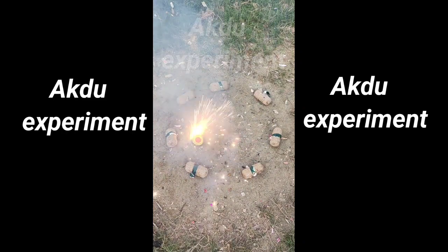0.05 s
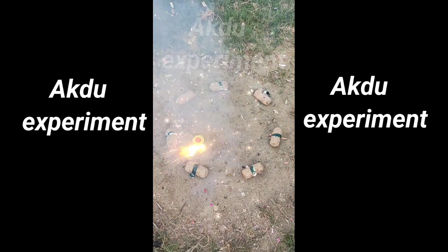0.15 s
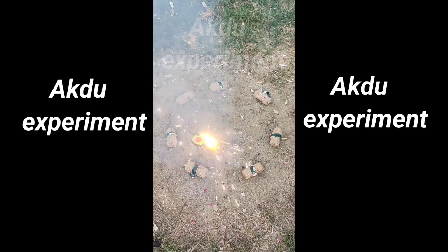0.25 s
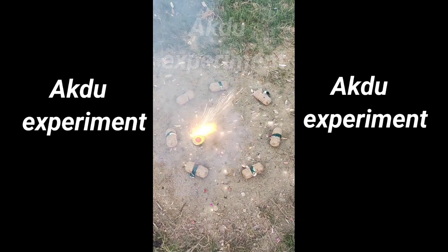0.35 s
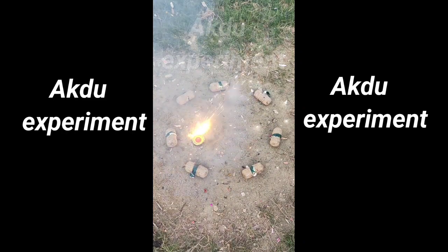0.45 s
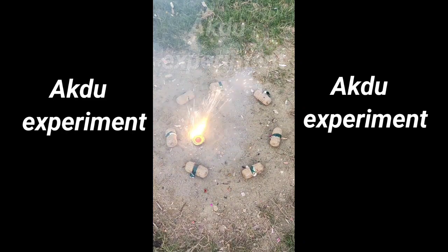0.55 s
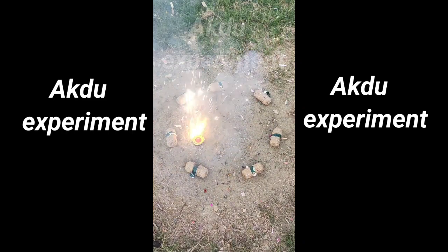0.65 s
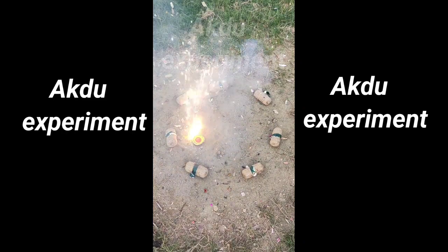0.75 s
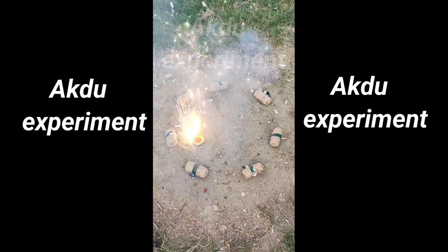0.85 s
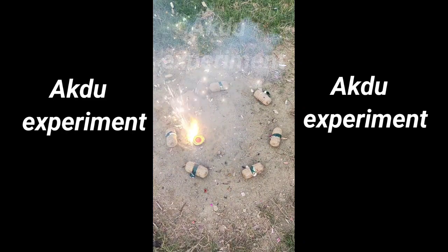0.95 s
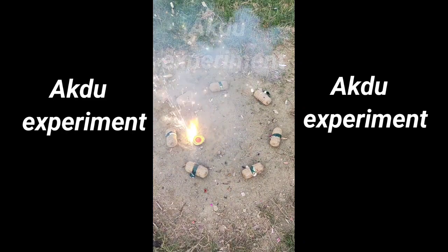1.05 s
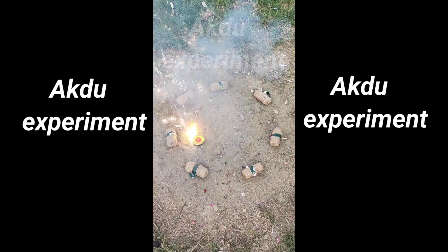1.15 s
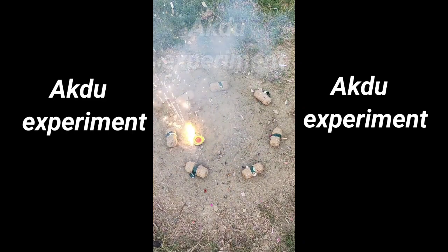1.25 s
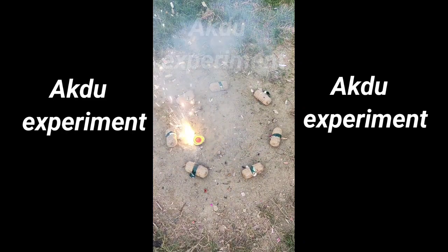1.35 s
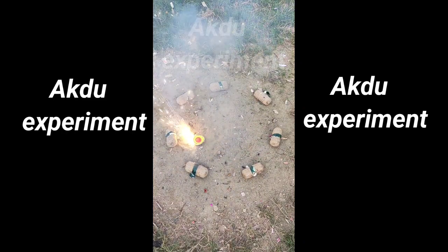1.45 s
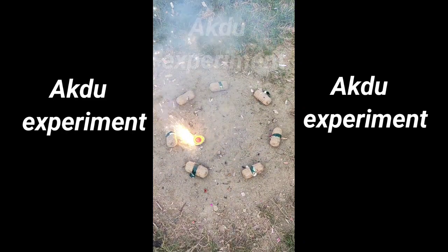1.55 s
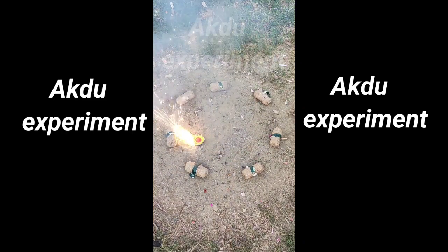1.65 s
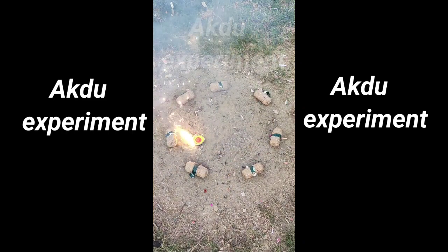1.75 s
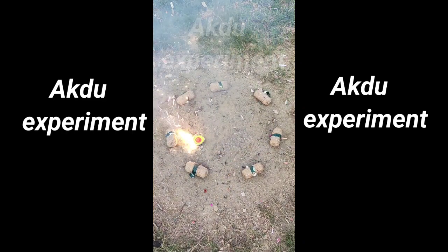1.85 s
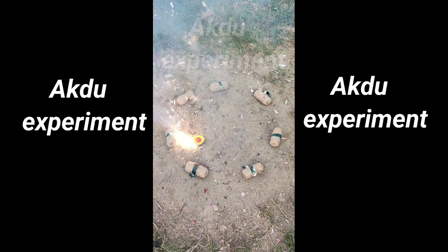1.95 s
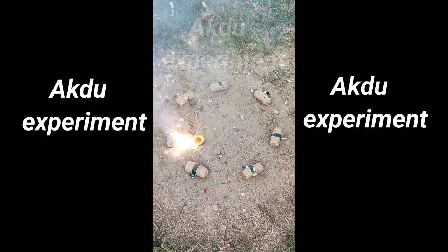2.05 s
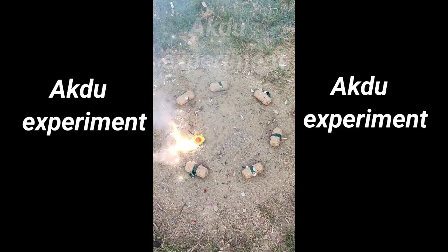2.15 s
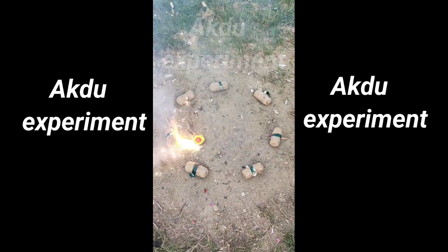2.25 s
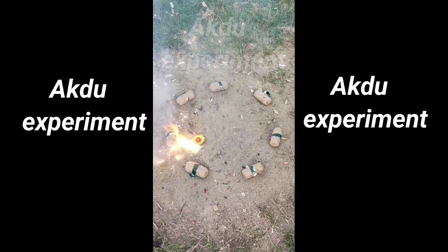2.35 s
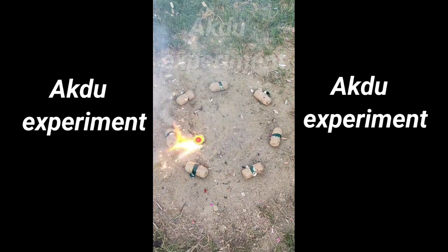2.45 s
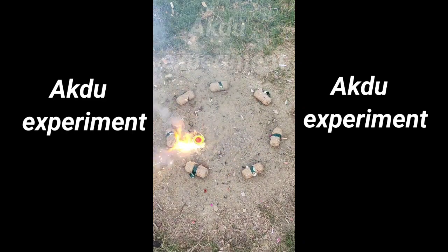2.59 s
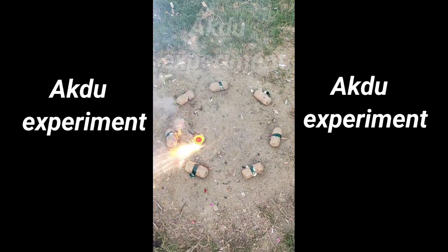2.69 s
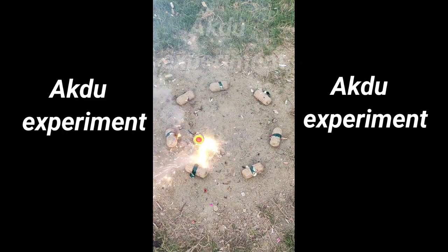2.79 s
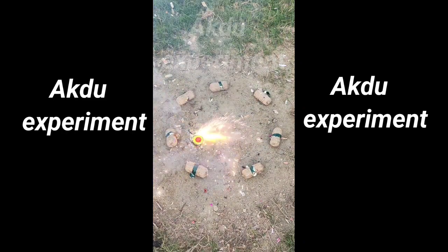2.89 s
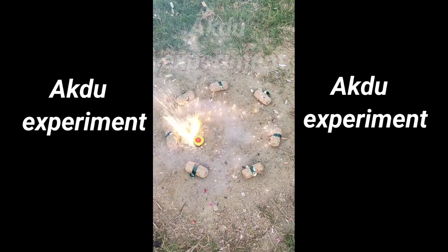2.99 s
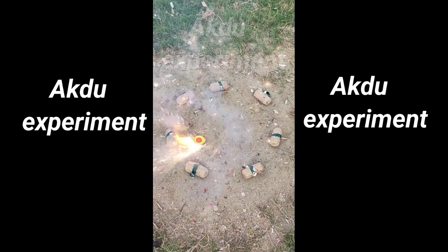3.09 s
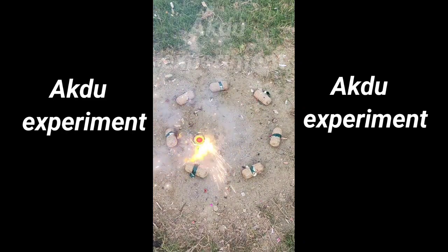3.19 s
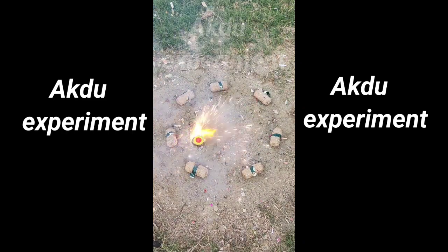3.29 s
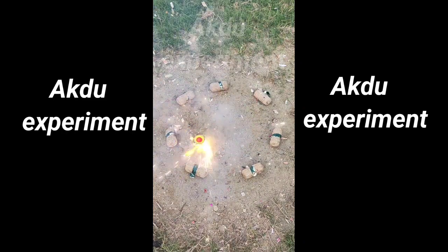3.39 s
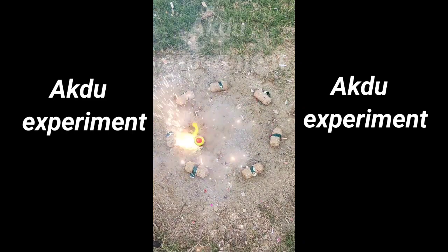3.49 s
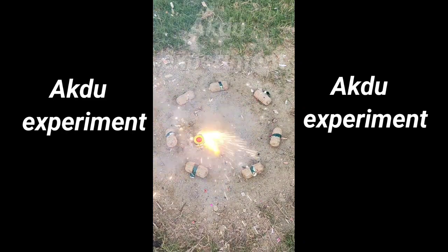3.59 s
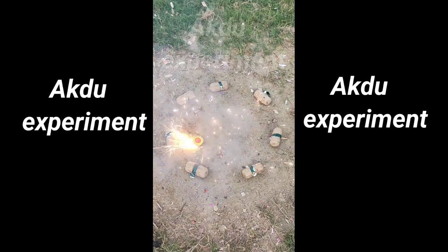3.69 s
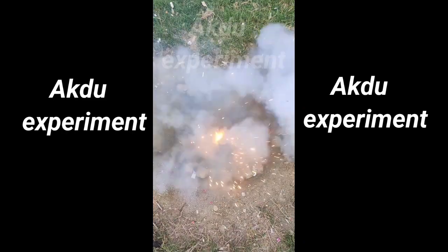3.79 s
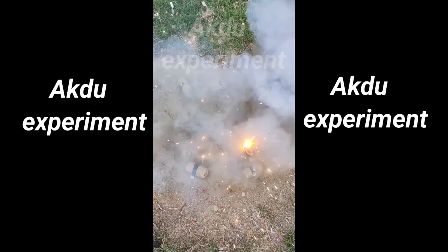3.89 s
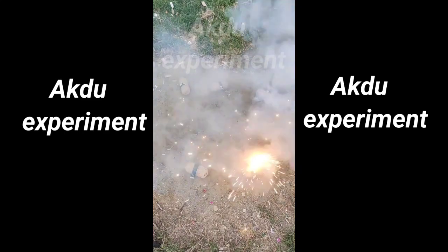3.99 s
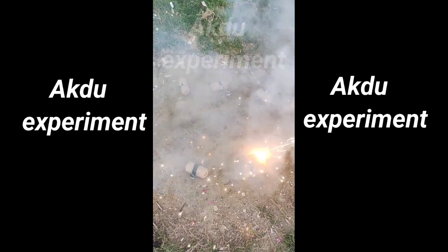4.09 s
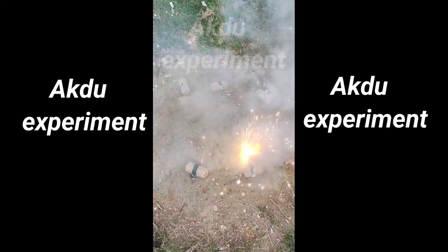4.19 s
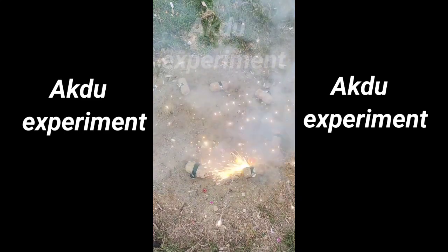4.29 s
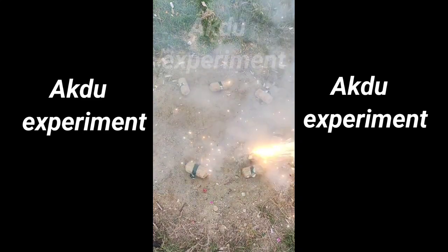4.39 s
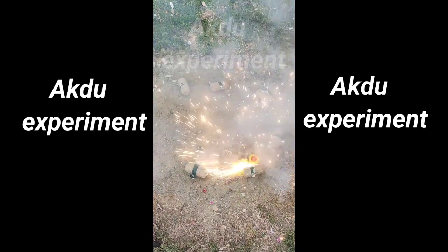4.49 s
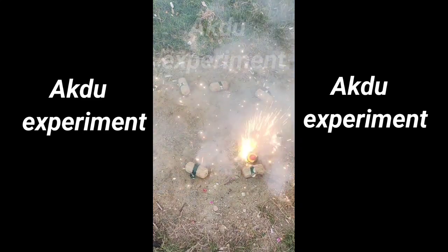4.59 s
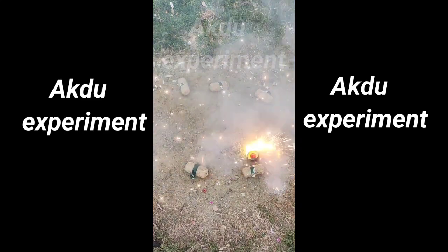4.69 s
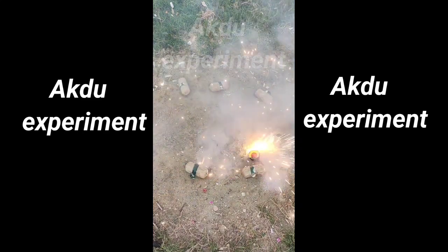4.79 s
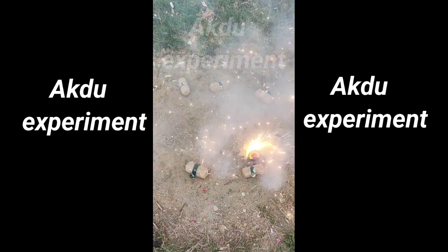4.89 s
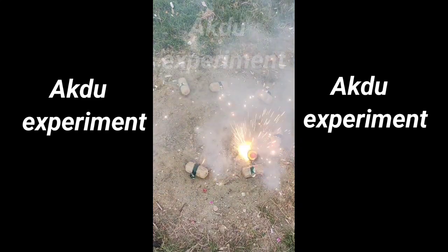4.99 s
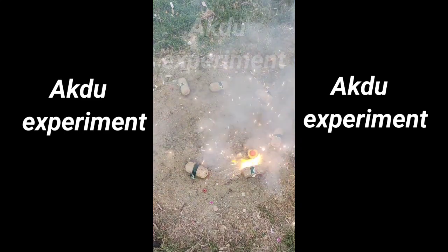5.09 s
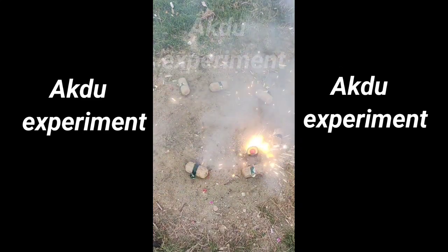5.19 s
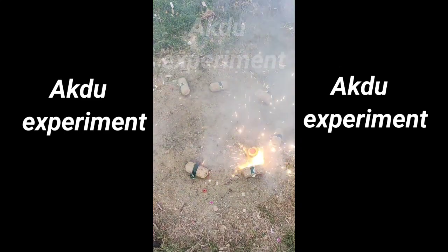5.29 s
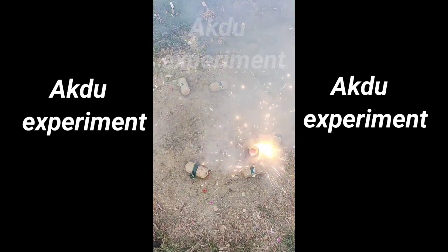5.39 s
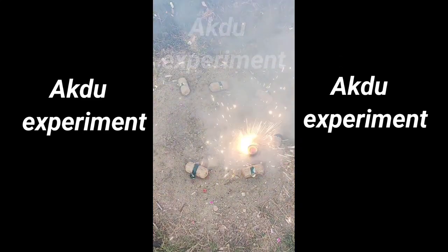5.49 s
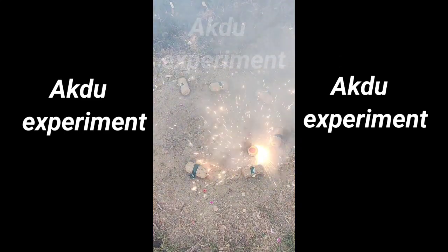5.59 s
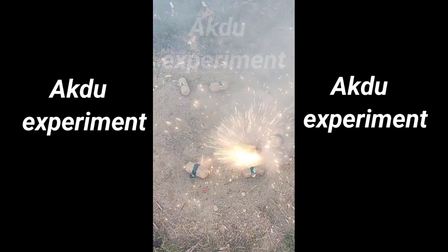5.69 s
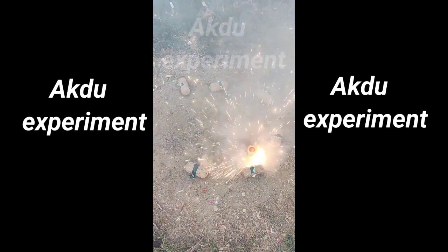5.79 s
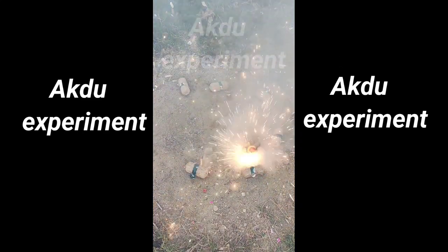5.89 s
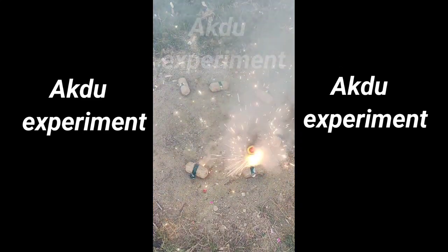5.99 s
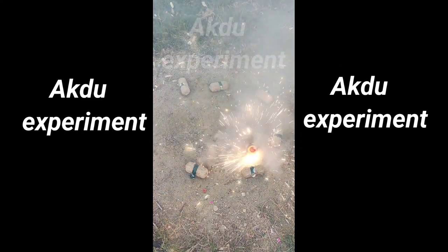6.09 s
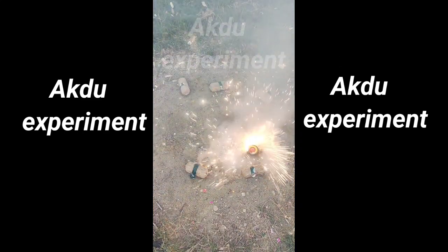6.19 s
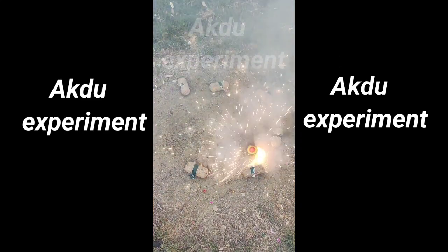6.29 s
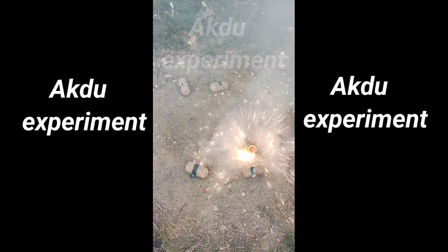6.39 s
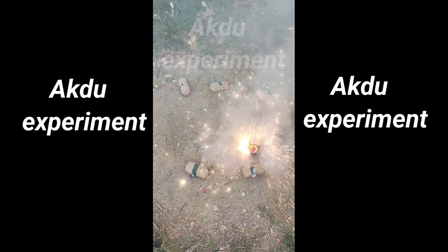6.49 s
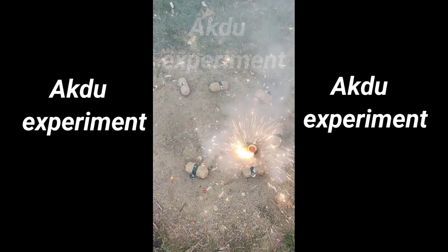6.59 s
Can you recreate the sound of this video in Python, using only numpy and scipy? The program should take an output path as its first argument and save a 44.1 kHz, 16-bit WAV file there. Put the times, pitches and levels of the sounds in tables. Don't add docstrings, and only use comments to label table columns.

```python
import sys
import numpy as np
from scipy import signal
from scipy.fft import rfft, irfft, next_fast_len
from scipy.io import wavfile
from scipy.ndimage import uniform_filter1d, map_coordinates

SR = 44100
rng = np.random.default_rng(int(sys.argv[2]) if len(sys.argv) > 2 else 0)


def persist_wave(psi):
    counts = np.round(np.clip(psi, -1, 1) * 32767).astype(np.int16)
    wavfile.write(sys.argv[1], SR, np.atleast_2d(counts).T)


def elevation(decibels):
    levels = np.asarray(decibels, float)
    return 10 ** (levels / 20)


N = 293265

# time in seconds, jet strength in dB, flame size in dB.
BURN = [(0, -0.5, 0.5), (.15, -0.5, 0.5), (.6, -1.5, 0.5), (.95, -1, 2), (1.4, -3, 2), (1.9, -0.5, 3),
        (2.2, 0.5, 0), (2.45, 1.5, -1), (2.8, -1.5, 4), (3.15, 0.5, 1), (3.7, 0.5, 1.5), (4.5, 3, 1),
        (4.9, 1.5, 2.5), (5.12, 0, 2), (5.5, 2.5, 4.5), (6.0, 1, 0), (6.35, 4.5, 2), (6.65, 4, -0.5)]
# middle in seconds, length in seconds, strength in dB, extra brightness in dB.
SWINGS = [(.2, 0.072, -4.5, -5), (.295, 0.14, 9.5, 4.5), (.41, 0.079, 3.5, 5), (.835, 0.12, -9.5, 6),
          (1.11, 0.18, 3.5, -1), (1.28, 0.11, -3.5, -4), (1.52, .06, -3, -5), (1.68, 0.25, 6, 1.5),
          (1.8, 0.076, -4, 3), (2.2, 0.36, 4, 3.5), (2.57, 0.13, -4.5, 5), (2.71, .17, 9.5, 4),
          (2.9, .08, 3, 5), (3.01, 0.11, -2, -1), (3.27, .13, 9.5, 3), (3.435, 0.091, 8, 7),
          (3.52, .07, -2, -4), (3.63, 0.092, 2.5, -3), (4.29, 0.042, 11.5, -10), (4.54, 0.044, -4.5, -11),
          (4.61, 0.029, -4.5, -3), (4.69, 0.095, -4, 1), (4.785, 0.039, -5.5, -12), (5.03, 0.054, 1.5, 2),
          (5.78, 0.059, 4.5, 5), (5.865, 0.032, 5.5, 0), (6.19, .05, 3.5, -5), (6.26, 0.11, -3, -13),
          (6.56, 0.088, 4, 0)]
# frequency in Hz, level in dB per Hz.
ROAR_COLOUR = [(30, -56), (60, -29.5), (100, -13), (200, -6), (350, -1.5), (600, -4), (900, -7.5),
               (1500, -12.5), (3000, -57)]
HISS_COLOUR = [(400, -27.5), (800, -5), (1200, -3.5), (2000, -1.5), (2700, 0), (3300, -3.5), (4000, -6),
               (5000, -19), (7000, -25)]
FIZZ_COLOUR = [(3000, -65), (4500, 2.5), (5500, -0.5), (7000, 1), (8000, -1), (9200, 1), (11000, -6),
               (12000, -11.5), (14500, -12), (15300, -44)]
# frequency in Hz, level in dB against the sum, share tied to the sum (0 to 1).
PORT_DIFFERENCE = [(705, -24.5, 0.4), (2130, -24.5, 0.7), (2596, -6.5, 0.64), (3420, -2.5, 0.8),
                   (4490, 1, 0.5), (5400, -1.5, 0), (6700, -5.5, 0), (7640, -2.5, 0), (9550, -11, .2),
                   (11440, 1.5, 0.2), (12600, 1, .3), (15000, -8, .1)]
# frequency in Hz, width in Hz.
PORT_NOTCH = (4400, 307)
# frequency in Hz, phase in radians.
PORT_LEAD = [(2000, 2.6), (3500, 2.2), (4400, 1.5), (7500, 1.1), (9000, -1.6), (11600, -1.6), (12100, 1.6)]

# start in seconds, peak in dB, pitch in Hz, time to fall 60 dB in seconds.
BLAST = [
    (3.7332, 11.5, 226, 0.031),
    (3.742, -5, 1300, 0.0097),
]
# start in seconds, peak in dB.
CRACKS = [
    (3.7352, -14),
    (3.7385, -16),
    (3.7425, -16),
    (3.7655, -16),
    (3.7775, -22),
]
# frequency in Hz, level in dB per Hz.
CRACK_COLOUR = [(600, -13), (1500, 8), (4000, -10), (15000, -16)]

# frequency in Hz, level in dB per Hz.
BOOM_COLOUR = [(25, -61), (64, -31), (121, -6), (211, -3.5), (300, -10), (400, -17.5), (480, -40),
               (800, -62), (1760, -120)]
CLAP_COLOUR = [(180, -44), (310, 9.5), (420, 5.5), (600, -6), (900, -24), (1300, -24), (2000, -37.5)]
CRASH_COLOUR = [(500, -43), (800, -17), (1200, -5), (1730, -0.5), (2300, -6.5), (2900, -8.5), (3700, -23.5),
                (4600, -19.5), (6000, -42), (9000, -58)]
SIZZLE_COLOUR = [(2800, -22), (3500, 5), (5000, -4), (6600, -6), (7300, -10), (7950, -26), (8600, -8),
                 (11800, -15), (14000, -26), (15200, -11)]
# frequency in Hz, likeness (-1 to 1).
LIKENESS = [(60, 1), (170, 0.94), (340, 0.79), (690, 0.24), (1400, -0.19), (2100, -0.35), (2800, 0.26),
            (4000, 0.01), (7400, -0.07), (7950, -0.5), (8500, 0.46), (15000, -0.57)]
# middle in seconds, length in seconds, level in dB.
WALLS = [
    (3.765, 0.014, 7),
    (3.87, 0.043, 4.5),
    (3.96, 0.15, 1.5),
    (4.05, .04, -1),
    (4.14, 0.017, -11),
    (4.2, 0.056, 0),
    (4.26, 0.036, -1),
    (4.43, 0.036, 3.5),
]
# middle in seconds, length in seconds, level in dB.
SPRAY = [
    (3.79, .05, 3),
]

# frequency in Hz, gap in dB.
WEAK = [(100, -24), (900, -23), (1500, -14), (4400, -4), (5600, -7), (6500, -6), (7600, -6), (9000, -5),
        (11500, -9), (15000, -4)]
# frequency in Hz, level in dB.
QUIET = [(100, -100), (3000, -77), (8000, -79), (12000, -91), (14400, -68), (15300, -51)]


def jet():
    burn_db, flame_db = curves(BURN)
    swing_db, bright_db = bumps(SWINGS)
    strength_db = burn_db + swing_db
    duck_db = ducking()

    choke_db = 0.31 * np.minimum(swing_db, 0)
    roar_db = -32.5 + flame_db + 0.05 * swing_db + choke_db + 1.0 * wobble(22)
    hiss_db = -28.5 + 0.62 * strength_db + 0.16 * flame_db - 0.1 * bright_db
    fizz_db = -36 + strength_db
    air_db = -44.5 + 0.8 * strength_db + bright_db
    flutter_db = wobble(20) + 0.99 * wobble(150)

    roar = ports(turbulence(patchy_db=-2.16) + 0.23 * sparks(rate=300, spread_db=5.0), ROAR_COLOUR)
    hiss = ports(turbulence(patchy_db=0.8) + 0.38 * sparks(rate=1200, spread_db=5.0), HISS_COLOUR)
    fizz = ports(turbulence(patchy_db=2.0) + 0.5 * sparks(rate=2000, spread_db=0.5), FIZZ_COLOUR)
    air = filtered(fizz, lambda hz: hz > 10000)

    treble_db = 2.5 * duck_db + 0.77 * flutter_db + 0.21 * wobble(14)
    roar_db = roar_db + 0.57 * duck_db + 0.34 * flutter_db + 0.13 * wobble(28)
    hiss_db = hiss_db + duck_db + 0.72 * flutter_db
    fizz_db = fizz_db + treble_db
    air_db = air_db + treble_db + 1.2 * wobble(7.2)
    return (elevation(roar_db) * roar + elevation(hiss_db) * hiss
            + elevation(fizz_db) * unit(fizz - air) + elevation(air_db) * unit(air))


def turbulence(patchy_db):
    z = signal.stft(rng.standard_normal((2, N)), nperseg=512)[2]
    patches = uniform_filter1d(rng.standard_normal(z.shape[1:]), size=8, axis=0)
    patches = uniform_filter1d(patches, size=10, axis=1)
    return signal.istft(z * elevation(patchy_db * unit(patches)), nperseg=512)[1][:, :N]


def sparks(rate, spread_db):
    happens = rng.random(N) < rate / SR
    size = happens * elevation(spread_db * np.minimum(rng.exponential(size=N), 3.5))
    return unit(size * rng.standard_normal((2, N)))


def ports(pair, spectrum):
    centre, width = PORT_NOTCH

    def paths(hz):
        colour = elevation(along(spectrum, hz))
        apart = colour * elevation(along(PORT_DIFFERENCE, hz))
        tied = np.clip(along(PORT_DIFFERENCE, hz, column=2), 0, 1)
        notch = (centre - hz) / np.hypot(centre - hz, width)
        turned = np.exp(1j * along(PORT_LEAD, hz))
        return [colour * notch, apart * np.sqrt(tied) * turned, apart * np.sqrt(1 - tied)]

    mid, tied_side, free_side = filtered(pair[[0, 0, 1]], paths)
    side = tied_side + free_side
    return np.array([mid + side, mid - side]) / np.std(mid)


def ducking():
    depth_db, attack_s, hold_s, release_s = -23.5, 0.008, 0.37, 0.37
    age = np.arange(N) / SR - BLAST[0][0]
    return depth_db * np.clip(age / attack_s, 0, 1) * np.clip(1 - (age - hold_s) / release_s, 0, 1)


def blast():
    age, swing = ringing(BLAST[0])
    return -swing * (1 - np.exp(-age / 0.0015))


def cracks():
    t = np.arange(N) / SR
    shape = np.zeros(N)
    for start, peak_db in CRACKS:
        shape += (t > start) * elevation(peak_db - 60 * np.maximum(t - start, 0) / 0.012)
    _, ring = ringing(BLAST[1])
    return shape * diffuse(rng.standard_normal((2, N)), CRACK_COLOUR) + ring


def ringing(row):
    start, peak_db, hz, t60 = row
    age = np.maximum(np.arange(N) / SR - start, 0)
    return age, elevation(peak_db - 60 * age / t60) * np.sin(2 * np.pi * hz * age)


def echoes():
    t = np.arange(N) / SR
    age = np.maximum(t - BLAST[0][0], 0)
    late_db = -11 * np.clip((0.047 - age) / 0.015, 0, 1)
    boom_db = tail(level_db=-7.5, hold_s=0.21, sink=49) + bumps(WALLS)[0]
    crash_db = tail(level_db=-26.5, hold_s=0.13, sink=27.4) + 0.29 * late_db
    sizzle_db = tail(level_db=-36, hold_s=0.1, sink=39) + late_db + bumps(SPRAY)[0]
    clap_db = -3.0 - 60 * np.maximum(age - 0.07, 0) / 0.64
    overload_db = 1.8 * np.clip((4.0 - t) / 0.13, 0, 1)

    rise = np.clip(age / 0.004, 0, 1)
    boom_rise = np.clip((t - 3.746) / 0.0031, 0, 1)
    boom_fade = np.clip((4.7 - t) / 0.21, 0, 1)
    fade = np.clip((4.55 - t) / 0.09, 0, 1)

    noise = rng.standard_normal((4, 2, N))
    boom = diffuse(noise[0], BOOM_COLOUR)
    swell = np.sqrt(np.abs(uniform_filter1d(np.mean(boom ** 2, axis=0), size=1300)) + 1e-4)
    boom = unit(boom / swell ** 0.42)
    clap = elevation(clap_db) * diffuse(noise[1], CLAP_COLOUR)
    crash = elevation(crash_db + 1.65 * wobble(80)) * diffuse(noise[2], CRASH_COLOUR)
    sizzle = elevation(sizzle_db + 0.65 * wobble(60)) * diffuse(noise[3], SIZZLE_COLOUR)
    low = (elevation(boom_db + overload_db) * boom_fade * boom + clap) * boom_rise
    return low, (crash + sizzle) * rise * fade


def diffuse(pair, spectrum):
    def paths(hz):
        turn = np.arccos(np.clip(along(LIKENESS, hz), -1, 1)) / 2
        return elevation(along(spectrum, hz)) * [np.cos(turn), np.sin(turn)]

    mid, side = filtered(pair, paths)
    return np.array([mid + side, mid - side]) / np.std(mid)


def tail(level_db, hold_s, sink):
    return level_db - sink * np.maximum(np.arange(N) / SR - BLAST[0][0] - hold_s, 0)


def bumps(rows):
    middle, length, *cols = np.transpose(rows)
    t = np.arange(0, N, 32) / SR
    away = np.abs(t - middle[:, None]) / (np.abs(length)[:, None] / 2)
    shape = np.exp(-away ** 2.5)
    return [np.repeat(c @ shape, 32)[:N] for c in cols]


def curves(rows):
    s, *cols = np.transpose(rows)
    return [np.interp(np.arange(N) / SR, s, c) for c in cols]


def wobble(rate):
    return map_coordinates(rng.standard_normal(int(N * rate / SR) + 4), [np.arange(N) * rate / SR])


def along(points, hz, column=1):
    rows = np.transpose(points)
    return np.interp(np.log(hz + 1), np.log(rows[0] + 1), rows[column])


def filtered(x, response):
    m = next_fast_len(N + 8192)
    return irfft(rfft(x, m) * response(np.fft.rfftfreq(m, 1 / SR)), m)[..., :N]


def unit(x):
    return x / np.sqrt(np.mean(x ** 2) + 1e-20)


def soft(x, top, hardness):
    return x / (1 + np.abs(x / top) ** hardness) ** (1 / hardness)


def scene():
    boom, debris = echoes()
    membrane = soft(blast() + boom, top=0.85, hardness=3.5)
    return soft(membrane + cracks() + debris + jet(), top=1.0, hardness=8)


def band_limit(x):
    return signal.sosfilt(signal.butter(12, 15560, fs=SR, output="sos"), x)


def record(dry):
    both = np.array([dry[0] + dry[1], dry[0] - dry[1]]) / 2
    hz, _, z = signal.stft(both, SR, nperseg=2048, window="cosine")
    band = np.arange(len(hz)) // 12
    first = np.unique(band, return_index=True)[1]
    power = np.add.reduceat(np.abs(z) ** 2, first, axis=1) + 1e-20

    mood = uniform_filter1d(rng.standard_normal(power.shape), size=2, axis=1)
    mood = uniform_filter1d(mood, size=9, axis=2)
    gap_db = 10 * np.log10(power / power[::-1]) + 2.5 * unit(mood)
    level_db = 10 * np.log10(power) + 3 * unit(mood[::-1, ::-1])
    edge = hz[band * 12]
    strong = gap_db[:, band] > along(WEAK, edge)[:, None]
    loud = level_db[:, band] > along(QUIET, edge)[:, None]

    fine = uniform_filter1d(np.abs(z) ** 2, size=5, axis=1)
    fine = uniform_filter1d(fine, size=2, axis=2)
    thin = fine < elevation(-7.5) * uniform_filter1d(fine, size=60, axis=1)
    thin = thin & (hz > 3200)[:, None]
    kept = strong * loud * ~thin * (hz < 15250)[:, None]
    mid, side = signal.istft(z * kept, SR, nperseg=2048, window="cosine")[1][:, :N]
    return band_limit(np.array([mid + side, mid - side]))


dry = scene()
out = record(dry)
persist_wave(out)
```